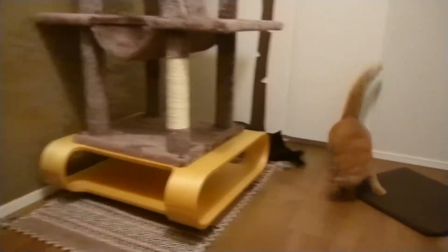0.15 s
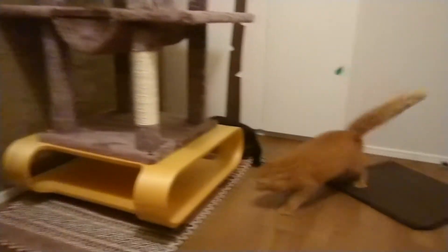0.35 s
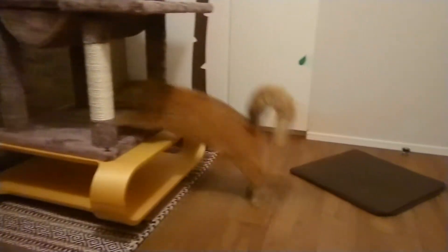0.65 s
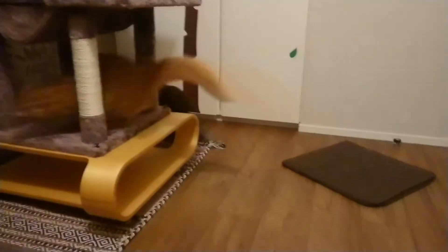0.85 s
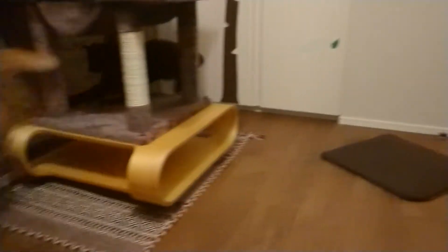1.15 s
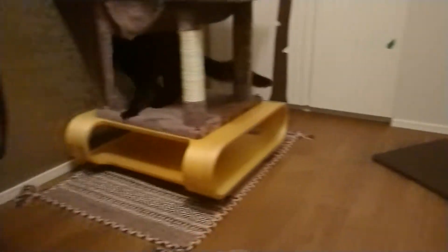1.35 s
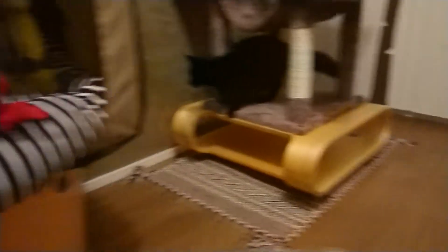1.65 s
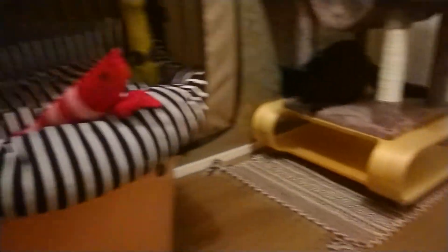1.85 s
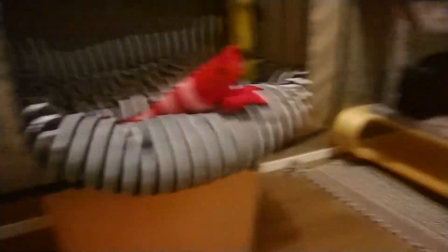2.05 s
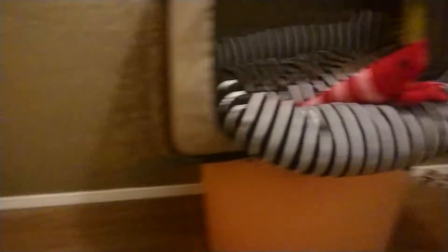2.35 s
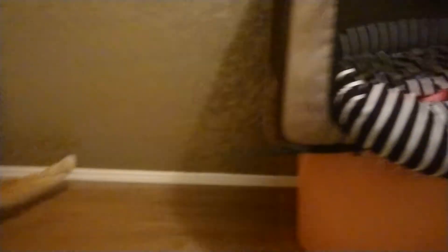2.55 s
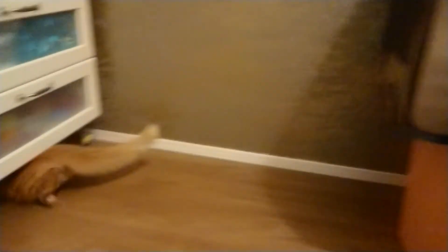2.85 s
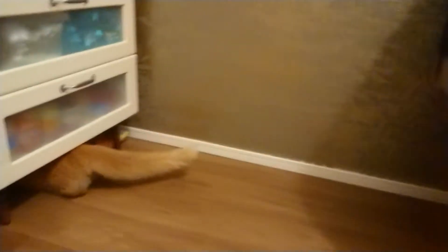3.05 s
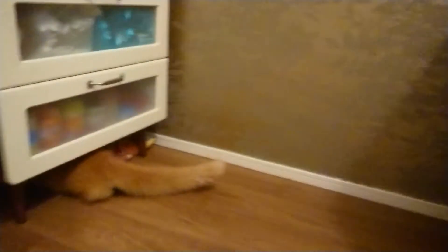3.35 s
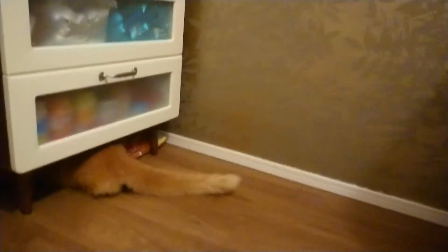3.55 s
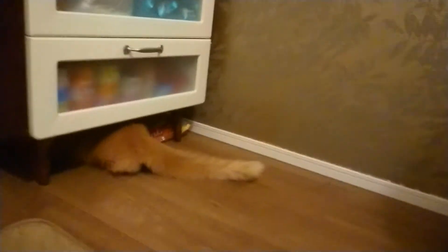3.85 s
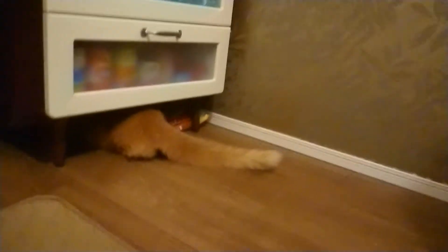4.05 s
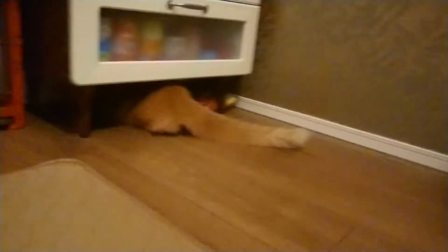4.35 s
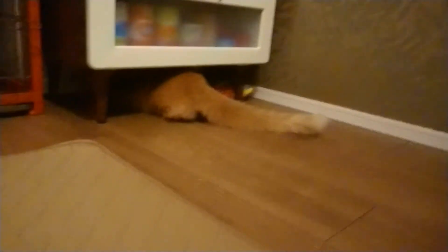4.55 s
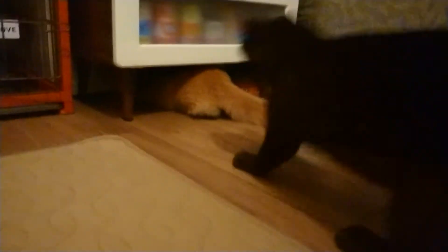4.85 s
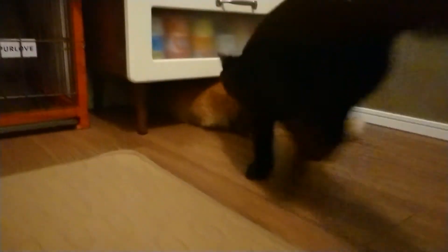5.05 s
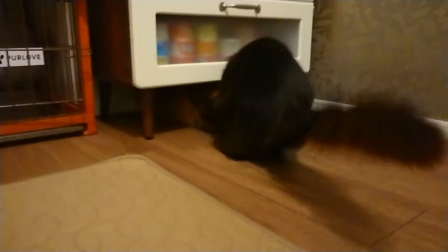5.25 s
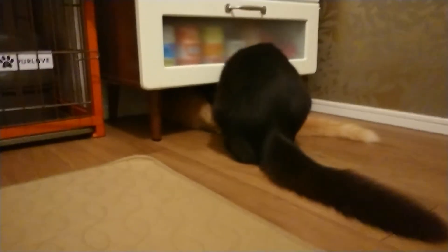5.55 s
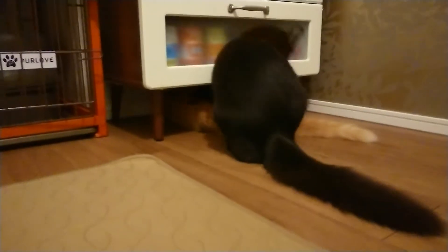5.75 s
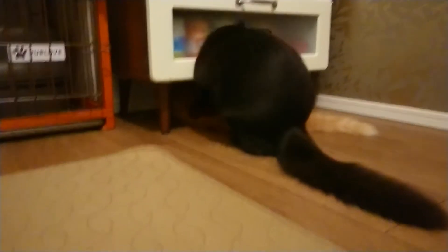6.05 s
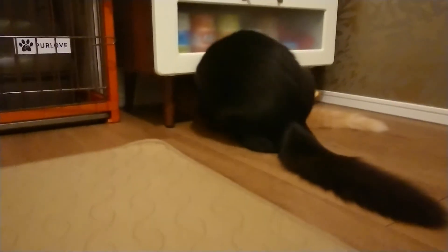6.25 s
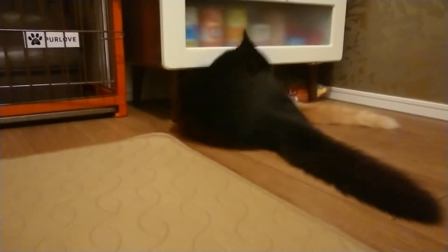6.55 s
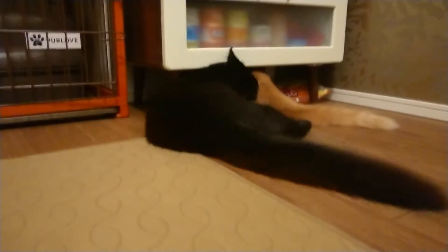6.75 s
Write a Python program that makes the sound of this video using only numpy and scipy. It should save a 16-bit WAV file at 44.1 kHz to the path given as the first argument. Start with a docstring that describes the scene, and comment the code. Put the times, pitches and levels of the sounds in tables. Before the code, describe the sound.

Two cats scamper and scuffle on a wooden floor indoors, paws thudding and claws skittering, with sharp knocks at the handheld camera.

```python
"""Claws scratch and paws thud at once: two cats chase and scuffle on the wooden floor of a small room.
Landings boom in boards and cat tree, claws skitter in noise catches, pads and fur brush along as noise strokes.
Hard clacks ring damped resonances, most on furniture and a few as dry ticks at the hand-held camera.
Something loose rattles on the cat tree; close up, dry knocks and one finger slip sound on the camera.
Behind it all lies the still room, a faint coloured noise from all around."""
import sys
import numpy as np
from scipy import signal
from scipy.fft import rfft, irfft, next_fast_len
from scipy.io import wavfile
from scipy.ndimage import uniform_filter1d, map_coordinates

SR = 44100
rng = np.random.default_rng(int(sys.argv[2]) if len(sys.argv) > 2 else 0)


def unload_audio(sound):
    """Save the sound as a 16-bit wav file, at the path given as the first command line argument."""
    columns = np.transpose(np.atleast_2d(sound))
    # keep every value between -1 and 1, then stretch to whole-number steps
    steps = np.round(np.clip(columns, -1, 1) * 32767)
    wavfile.write(sys.argv[1], SR, steps.astype(np.int16))


N = 304546  # length in samples
T = np.arange(SR // 2) / SR  # time since a blow, s
HZ = np.fft.rfftfreq(len(T), 1 / SR)  # frequency axis of one blow, Hz

# All event levels are relative: each source adds its own level_db or gain.
# Paws and bodies landing on boards and cat tree: (t/s, level/dB, boom f/Hz)
LANDINGS = [(0.044, -48, 796), (0.172, -41.5, 64.7), (0.236, -36, 565), (0.354, -42.5, 298),
            (0.42, -49, 169), (0.554, -42.5, 298), (0.57, -41, 420), (0.615, -51, 363), (0.914, -43.5, 733),
            (0.926, -40.5, 253), (0.942, -40.5, 250), (1.171, -26, 359), (1.199, -34.5, 245),
            (1.226, -34, 310), (1.281, -31, 282), (1.334, -26.5, 460), (1.388, -27.5, 280),
            (1.413, -35.5, 270), (1.567, -41.5, 116), (1.701, -44.5, 239), (1.862, -52.5, 290),
            (1.915, -49, 114), (2.027, -55.5, 191), (2.142, -44, 112), (2.248, -50.5, 188),
            (3.959, -57, 202), (4.046, -58, 154), (4.341, -39.5, 229), (4.362, -45, 70), (4.435, -46, 206),
            (4.461, -40.5, 203), (4.493, -47, 81.5), (4.534, -41.5, 207), (4.563, -34, 203),
            (4.889, -38, 280), (4.929, -51.5, 257), (5.065, -34.5, 187), (5.11, -39, 298),
            (5.157, -39.5, 161), (5.243, -36.5, 96), (5.455, -23, 153), (5.498, -36, 166),
            (6.071, -40.5, 142.4), (6.101, -49.5, 80.7)]
# Claws striking and skidding: (t/s, level/dB, rise/s, skid t60/s, treble tilt/dB per octave)
CLAW_STROKES = [(0.0424, -34.5, .0007, 0.1, 2), (0.0598, -35, 0.00084, 0.0317, 0),
                (0.2382, -34, 0.00095, 0.26, 1.5), (0.2699, -29, 0.00092, 0.032, 1.5),
                (0.2887, -39.5, 0.0027, 0.049, -.5), (0.5587, -48, 0.0011, 0.045, -4),
                (0.845, -51.5, .026, .19, -2.5), (0.9675, -48, 0.00065, 0.017, -3.5),
                (1.0972, -41.5, .0005, .02, -5), (1.1741, -39, 0.00052, 0.015, -5.5),
                (1.3267, -42.5, 0.0033, 0.024, 0), (1.886, -57.5, 0.01, 0.16, 1),
                (2.023, -60.5, 0.0018, 0.095, -6), (2.144, -54.5, .008, 0.12, 2),
                (2.198, -45, 0.00092, 0.066, -2), (2.496, -61, 0.014, 0.078, -13.5),
                (2.864, -46.5, .002, 0.024, -3), (2.919, -52, 0.00052, .009, -6),
                (4.343, -57.5, .001, .036, 7.5), (4.4632, -49, .0007, .04, 9.5),
                (4.485, -48, .027, .064, 15), (4.6098, -48, 0.00045, .013, 7),
                (4.787, -56.5, .02, .074, .5), (4.8583, -51.5, 0.0018, 0.026, 5),
                (5.068, -48.5, .0007, 0.02, -4.5), (5.3218, -42, 0.00039, .027, 0.5),
                (5.748, -43.5, 0.0004, 0.018, -1), (5.9718, -59, .0005, 0.008, 5)]
# Hard clacks on furniture, and a few dry ticks at the camera (3.829, 4.109, 4.1538 s):
# (t/s, level/dB, ring f/Hz, Q)
HARD_CLACKS = [(0.042, -43.5, 930, 2.5), (0.239, -37, 597, 1.8), (0.269, -39, 1080, 0.81),
               (0.554, -45.5, 620, 2.6), (0.914, -38, 684, 2.9), (0.969, -42, 1500, 1),
               (1.097, -33.5, 1280, 0.4), (1.1711, -27.5, 724, 4.2), (1.202, -28.5, 740, 0.89),
               (1.333, -28, 1210, 6), (1.351, -33, 870, 12), (1.399, -38, 1190, 3.6),
               (2.919, -42.5, 1860, 7.2), (3.829, -60, 1500, 2.5), (4.109, -49, 1940, 4.6),
               (4.1538, -37, 2980, 2.3), (4.345, -45, 690, 4.8), (4.366, -47, 786, 4.9),
               (4.539, -49, 650, 2), (4.564, -47.5, 2400, 4.1), (4.6117, -30, 2520, 0.44),
               (4.889, -46.5, 810, 1.8), (5.067, -40, 830, 2.3), (5.322, -28, 1430, 2.1),
               (5.568, -46, 980, 3), (5.749, -34, 970, 3.8), (5.7741, -32.5, 990, 3.2),
               (6.009, -53.5, 1320, 2)]
# Knocks at the camera: (t/s, level/dB, low edge f/Hz, treble roll-off f/Hz, low push re snap/dB)
CAMERA_KNOCKS = [(3.462, -9.6, 400, 4530, -20.5), (3.4649, -23.5, 90, 222.7, -0.5),
                 (3.923, -40, 250, 700, -30), (4.1502, -30.5, 200, 696, -39), (4.1538, -25, 170, 450, -34),
                 (4.1733, -43, 200, 350, -18), (4.19, -50, 250, 450, -28), (4.25, -49.5, 250, 700, -24),
                 (4.286, -53, 400, 1110, -35.5), (4.299, -41, 149, 450, -24),
                 (4.5933, -22.5, 250, 2400, -17.5), (4.712, -38.5, 350, 3220, -15),
                 (4.809, -36, 150, 450, -28), (4.8594, -28.5, 280, 2200, -23), (5.843, -42, 200, 400, -30)]
# Pads and bodies sliding on wood, strokes cut to half a second: (middle t/s, half length/s, level/dB, centre f/Hz)
PAD_SLIDES = [(0.01, 0.066, -52, 750), (0.392, 0.078, -53, 600), (0.657, 0.064, -58, 720),
              (0.789, 0.072, -60, 850), (0.98, 0.062, -51.5, 1450), (1.089, 0.17, -49.5, 1240),
              (1.418, 0.083, -57, 1420), (1.72, 0.052, -65, 1690), (1.972, .1, -63.5, 750),
              (2.21, .087, -63, 780), (2.752, .11, -58, 463), (2.89, .1, -63, 500),
              (3.042, 0.12, -64.5, 1480), (4.421, .15, -66, 1520), (4.655, .05, -62, 2200),
              (4.858, .076, -65, 1700), (5.25, .17, -57, 930), (5.544, 0.19, -67, 830),
              (6.379, 0.037, -66, 895), (6.581, 0.069, -63.5, 435), (6.718, 0.93, -69.5, 1400)]
# Something loose on the shaken cat tree: (t/s, level/dB)
TREE_RATTLES = [(1.172, -37), (1.203, -37), (1.286, -45), (1.33, -45.5), (1.353, -40.5), (1.603, -61),
                (1.711, -55.5)]
# Fur brushing along rug and furniture: (middle t/s, half length/s, level/dB)
FUR_STROKES = [(0.033, 0.19, -58), (0.611, 0.098, -67.5), (0.993, 0.35, -71), (1.62, 0.043, -66),
               (1.947, 0.055, -66.5), (2.112, 0.033, -66.5), (2.219, 0.041, -59), (2.72, 0.088, -71),
               (3.004, .1, -75.5), (3.184, .025, -70), (3.352, .12, -82), (4.512, 0.046, -60.5),
               (4.587, .02, -67.5), (4.886, 0.03, -59), (5.13, 0.065, -65), (5.245, 0.08, -53.5),
               (5.883, 0.11, -76.5), (6.4, 0.037, -76), (6.617, 0.087, -69), (6.852, 0.126, -74.5)]
# How busy the feet are: (t/s, level/dB)
FOOT_BUSTLE = [(0.0, -51.5), (0.25, -52.5), (0.67, -69), (0.94, -60.5), (1.33, -48), (1.86, -64),
               (3.27, -77.5), (4.15, -72.5), (4.44, -59.5), (5.46, -66.5), (5.81, -68), (6.91, -69)]
# How roomy contacts sound and from which side: (t/s, relative room share/dB, left minus right/dB)
CONTACT_PLACE = [(0, 7, -7), (1.2, 1, -6), (1.42, 0.5, -5), (1.6, 6.5, -7.5), (2.9, 1, -4.5),
                 (3.8, -21, -5.5), (4.11, -26, 0), (4.35, 1, -4), (4.58, -5.5, -0.5), (5.1, 3.5, -3),
                 (5.32, -6, -3), (5.5, -1, -1.5), (5.75, 0, 1), (6.1, 1.5, -0.5)]
# Colour of the floorboards: (f/Hz, level/dB)
BOARD_COLOUR = [(21, -58.5), (35, -47.5), (72, 0), (123, -8), (150, -3), (279, -3), (353, -4.5),
                (523, -5.5), (632, -12), (812, -10), (1500, -23.5), (1950, -24.5), (3300, -120)]
# Resonances of the floorboards: (f/Hz, Q, lift/dB)
BOARD_RESONANCES = [(95, 3.2, 0.5), (158, 27, 4), (278.3, 24.9, 5.5), (397, 8, 2)]
# Colour of claws on wood: (f/Hz, level/dB)
CLAW_COLOUR = [(1180, -32), (2000, -6.5), (2400, -4), (3100, -7.5), (3900, -7), (4600, -5.5), (5400, -1),
               (7000, -2.5), (8050, 1.5), (10200, -6), (12800, -10.5), (14500, -10), (16000, -22)]
# Colour shared by the hard clacks and ticks: (f/Hz, level/dB)
CLACK_COLOUR = [(100,-11), (400,-2), (900,0.5), (2000,3.5), (3500,-6), (8000,-11.5), (16000,-37)]
# Resonances of the loose part: (f/Hz, Q, level/dB)
RATTLE_RESONANCES = [(3880, 12, -4.5), (4600, 8, -11.5), (6500, 6.1, -6), (8740, 11, -3.5), (11000, 4, -18)]
# Colour of brushing fur: (f/Hz, level/dB)
FUR_COLOUR = [(1470, -50.5), (2500, -9), (2900, -11.5), (4480, -9), (5520, -7.5), (6700, -11), (7470, -5),
              (12400, -12), (15000, -12), (16000, -11)]
# Colour of the camera case: (f/Hz, level/dB)
CASE_COLOUR = [(30, -39.5), (100, 11.5), (400, 5.5), (800, 5), (1400, 2.5), (2200, -14.5), (3000, -13.5),
               (4200, -15), (5300, -4.5), (8500, -4.5), (12000, -12), (16000, -4)]
# Colour of the still room: (f/Hz, level/dB)
HUSH_COLOUR = [(25,-26), (45,-10), (90,5.5), (150,-8.5), (250,-22), (500,-22), (1100,-17.5), (2000,-20.5),
               (3200,-27), (5500,-35), (12000,-34.5), (16000,-45)]
# Decay of the room: (f/Hz, t60/s)
ROOM_DECAY = [(60, 0.27), (250, 0.37), (1000, 0.37), (4000, 0.46), (9000, 0.3), (16000, 0.38)]
# Diffuse sound at the two microphone ports: (f/Hz, left-right likeness from 0 to 1)
PORT_LIKENESS = [(60, 0.61), (250, 0.88), (600, 0.47), (1200, 0.0067), (8000, 0.027)]

STEPS_PER_S, STEP_SCATTER_DB = 22, 3  # light steps between the landings
SHUDDER_DB, SHUDDER_T60_S = -24.5, 0.53  # the floor keeps trembling after a landing
KNOCK_PAN_DB = 6  # the hand is nearer the left port
HUSH_DB = -71  # rms level of the still room
TOP_HZ = 16150  # upper band limit of the camera


def paws(level_db=-2, room_db=0, q=2.04, soft=2.2, pan_db=-2.5):
    """A padded blow swells and booms in the boards; the soft pad keeps out all that lies far above the boom."""
    out = np.zeros((2, N))
    floor = boards()
    for s, db, hz in LANDINGS:
        wet_db, _ = place(s)
        blow = in_room(signal.unit_impulse(len(T)), room_db + wet_db)
        boom = resonance(hz, q) ** 1.29
        pad = 1 / np.hypot(1, (HZ / (soft * hz + 100)) ** 3)
        add(out, s + .0015, ring(blow, floor * boom * pad), db + level_db, pan_db)
    return out


def shudder():
    """Every landing leaves the floor trembling, in proportion to its weight."""
    t = np.arange(N) / SR
    power = np.zeros(N)
    for s, db, _ in LANDINGS:
        power += (amp(db) * (t > s) * fade(SHUDDER_T60_S, abs(t - s))) ** 2
    return amp(SHUDDER_DB) * np.sqrt(power) * rush(BOARD_COLOUR)


def footwork(steps_db=-4, stir_db=-5, room_db=2):
    """Light steps patter at random and shifting weight stirs the boards, both louder when the cats are busy."""
    bustle = amp(np.interp(np.arange(N) / SR, *np.transpose(FOOT_BUSTLE)))
    step_now = rng.random(N) < STEPS_PER_S / SR
    steps = step_now * amp(STEP_SCATTER_DB * rng.standard_normal(N))
    patter = unit(in_room(ring(steps[None], boards()), room_db))
    return bustle * (amp(steps_db) * patter + amp(stir_db) * rush(BOARD_COLOUR))


def claws(level_db=-3, room_db=3, tick=3.9, grit_db=4.0, uneven_db=1.8, pan_db=0):
    """A claw ticks down, then skids in tiny catches; every spot has its own small resonances."""
    out = np.zeros((2, N))
    for s, db, rise, skid, tilt_db in CLAW_STROKES:
        onset = 1 - np.exp(-T / max(rise, 1e-4))
        stroke = (fade(skid) + tick * fade(0.0086)) * onset
        catches = amp(grit_db * rng.standard_normal(len(T))) * stroke
        scratch = in_room(catches * rng.standard_normal((2, len(T))), room_db)
        spot = uneven_db * unit(uniform_filter1d(rng.standard_normal(len(HZ)), size=220))
        tilt = tilt_db * np.log2((HZ + 500) / 6000)
        colour = amp(along(CLAW_COLOUR, HZ) + spot + tilt)
        add(out, s, ring(scratch, colour), db + level_db, pan_db)
    return out


def clacks(level_db=-2, room_db=-2, scatter=0.11, spread=0.02, port_delay=0.00028):
    """A hard contact rings one damped resonance, with a few milliseconds of scattered noise around it."""
    out = np.zeros((2, N))
    for s, db, hz, q in HARD_CLACKS:
        wet_db, pan_db = place(s)
        contact = scatter * fade(spread) * rng.standard_normal((2, len(T)))
        contact[0, round(port_delay * SR)] += 1  # the left port hears the blow later
        contact[1, 0] += 1
        body = amp(along(CLACK_COLOUR, HZ)) * resonance(hz, q)
        add(out, s, ring(in_room(contact, room_db + wet_db), body), db + level_db, pan_db)
    return out


def rattle(level_db=-3, room_db=1, t60=0.019, grit_db=6, pan_db=1):
    """A short chatter of tiny contacts rings a few bright resonances."""
    out = np.zeros((2, N))
    body = sum(amp(db) * resonance(hz, q) ** 2 for hz, q, db in RATTLE_RESONANCES)
    for s, db in TREE_RATTLES:
        contacts = fade(t60) * amp(grit_db * rng.standard_normal(len(T)))
        chatter = contacts * rng.standard_normal((2, len(T)))
        add(out, s, ring(in_room(chatter, room_db), body), db + level_db, pan_db)
    return out


def slides(level_db=2, q=1.42, grain_db=3, catch_rate=500, room_db=0, pan_share=.7):
    """Pads slide in uneven catches, each stroke stirring the wood around one pitch."""
    out = np.zeros((2, N))
    middle = T[-1] / 2
    ending = 1 - fade(0.085, T[::-1])  # brings the cut end smoothly to zero
    for s, width, db, hz in PAD_SLIDES:
        _, pan_db = place(s)
        stroke = swell(middle, width)[:len(T)] * amp(grain_db * wobble(catch_rate, len(T)))
        friction = in_room(stroke * diffuse(len(T)), room_db)
        wood = resonance(hz, q) / np.hypot(1, (HZ / 3000) ** 2)
        add(out, s - middle, ring(friction, wood) * ending, db + level_db, pan_share * pan_db)
    return out


def brushing(level_db=0, room_db=-3, grain_db=2, pan_db=0):
    """Fur hisses along rug and wood in smooth, finely grained strokes."""
    strokes = sum(amp(db) * swell(s, width) for s, width, db in FUR_STROKES)
    hiss = strokes * unit(rush(FUR_COLOUR) * amp(grain_db * wobble(300)))
    return sides(level_db, pan_db) * in_room(hiss, room_db)


def knocks(level_db=-7, lag=.0005, push_hz=92, push_t60=0.071, port_delay=0.000395, room_db=-30,
           case_hz=1300, case_db=3):
    """Dry knocks: bending waves bring the treble first and the bass last; the case pings and a low push dies away."""
    out = np.zeros((2, N))
    case = amp(along(CASE_COLOUR, HZ) + case_db * resonance(case_hz, 1.5) ** 2)
    bending = 4 * np.pi * lag * np.sqrt(HZ * 1000)  # phase; lag is the travel time at 1 kHz, s
    ports = np.exp(-2j * np.pi * HZ * np.array([[0], [port_delay]]))  # the right port hears it later
    wave = irfft(np.exp(-1j * bending) * ports) * fade(.3)
    push = np.sin(2 * np.pi * push_hz * T) * fade(push_t60) * (1 - fade(0.0033))
    for s, db, low_hz, hz, push_db in CAMERA_KNOCKS:
        treble_cut = 1 / np.hypot(1, (HZ / hz) ** 1.54)
        bass_cut = 1 / np.hypot(1, (low_hz / (HZ + 1)) ** 2)
        snap = ring(wave, case * treble_cut * bass_cut)
        knock = snap / np.abs(snap).max() + amp(push_db) * push
        add(out, s, in_room(knock, room_db), db + level_db, KNOCK_PAN_DB)
    return out


def finger_slip(s=3.4825, db=-41, width=0.0084, pan_db=10):
    """A fingertip slips briefly over the case after the hardest knock: a short swell of coloured noise."""
    colour = [(200, 5), (1500, 0.0), (3000, -1.5), (6000, -3.5), (11000, -11.5), (15000, 4.5)]  # (f/Hz, level/dB)
    return sides(db, pan_db) * swell(s, width) * rush(colour)


def still_room():
    """The steady hush of the room arrives from all around as faint diffuse noise."""
    return amp(HUSH_DB) * rush(HUSH_COLOUR)


def boards():
    """Gain of the floorboards at HZ: a broad colour lifted at a few resonances."""
    lift = sum(db * resonance(hz, q) ** 2 for hz, q, db in BOARD_RESONANCES)
    return amp(along(BOARD_COLOUR, HZ) + lift)


def place(s):
    """Relative room share/dB and left minus right/dB of a contact at s seconds."""
    times, *columns = np.transpose(CONTACT_PLACE)
    return [np.interp(s, times, column) for column in columns]


def in_room(x, room_db):
    """A sound plus the room's answer, a decaying diffuse tail drawn anew for every call."""
    hz, t, z = signal.stft(diffuse(len(T)), SR, nperseg=256)
    decay = fade(along(ROOM_DECAY, hz)[:, None], t)
    tail = signal.istft(z * decay, SR, nperseg=256)[1][:, :len(T)]
    tail = tail * (1 - fade(0.0056))  # the answer builds up after the direct sound
    tail = tail / np.linalg.norm(tail[0])
    answer = signal.fftconvolve(np.atleast_2d(x), tail, axes=1)[:, :x.shape[-1]]
    return x + amp(room_db) * answer


def diffuse(size):
    """Stereo noise from all around: alike in the bass, nearly unrelated in the treble."""
    def mid_and_side(hz):
        turn = np.arccos(np.clip(along(PORT_LIKENESS, hz), -1, 1)) / 2
        return np.array([np.cos(turn), np.sin(turn)])

    mid, side = filtered(rng.standard_normal((2, size)), mid_and_side)
    return np.array([mid + side, mid - side])


def rush(spectrum):
    """Diffuse noise of rms 1 with this colour."""
    return unit(filtered(diffuse(N), lambda hz: amp(along(spectrum, hz))))


def resonance(hz, q):
    """Gain of one resonance at HZ."""
    return 1 / np.hypot(1, q * (HZ / hz - hz / (HZ + 1)))


def ring(x, gain):
    """x through a causal, minimum-phase body with this gain at HZ."""
    cepstrum = irfft(np.log(np.maximum(gain, 1e-6)))
    # folding the cepstrum forward in time makes the response causal
    cepstrum[1:len(T) // 2] *= 2
    cepstrum[len(T) // 2 + 1:] = 0
    response = irfft(np.exp(rfft(cepstrum)))
    return signal.fftconvolve(x, response[None], axes=1)[:, :x.shape[-1]]


def filtered(x, response):
    """x times a response of frequency."""
    n = x.shape[-1]
    m = next_fast_len(n + 8192)
    return irfft(rfft(x, m) * response(np.fft.rfftfreq(m, 1 / SR)), m)[..., :n]


def add(track, s, sound, db, pan_db):
    """Mix in a sound at s seconds, its loudest two milliseconds at db."""
    top = np.sqrt(uniform_filter1d(np.mean(sound ** 2, axis=0), SR // 500).max())
    start = round(s * SR)
    sound = sound[:, max(0, -start):]  # drop what lies before the beginning
    part = track[:, max(0, start):][:, :sound.shape[1]]
    part += (sides(db, pan_db) * sound / top)[:, :part.shape[1]]


def sides(db, pan_db):
    """Left and right gains for a level and a left-minus-right difference."""
    return amp([[db + pan_db / 2], [db - pan_db / 2]])


def swell(s, width):
    """A smooth stroke centred on s seconds."""
    return np.exp(-((np.arange(N) / SR - s) / width) ** 2)


def wobble(rate, size=N):
    """A smooth random curve, rate knots a second."""
    knots = rng.standard_normal(int(size * rate / SR) + 4)
    return map_coordinates(knots, [np.arange(size) * rate / SR])


def fade(t60, t=T):
    """Exponential decay by 60 dB in t60 seconds."""
    return np.exp(-np.log(1000) * t / np.maximum(t60, 1e-4))


def along(points, hz):
    """Interpolate (f/Hz, value) points on a log frequency axis."""
    f, v = np.transpose(points)
    return np.interp(np.log(hz + 1), np.log(f + 1), v)


def unit(x):
    """Scale to rms 1."""
    return x / np.sqrt(np.mean(x ** 2) + 1e-20)


def amp(db):
    """Decibels to gain."""
    return 10 ** (np.asarray(db) / 20)


def scene():
    """The cats, the hard clacks and ticks, the knocks at the camera and the still room."""
    cats = paws() + shudder() + footwork() + claws() + rattle() + slides() + brushing()
    return cats + clacks() + knocks() + finger_slip() + still_room()


def record(dry, low_hz=40):
    """The camera thins out the deep bass and keeps nothing above its band limit."""
    bass_cut = signal.butter(N=4, Wn=low_hz, btype="high", fs=SR, output="sos")
    thinned = signal.sosfilt(bass_cut, dry)
    return filtered(thinned, lambda hz: hz < TOP_HZ)


dry = scene()
out = record(dry)
unload_audio(out)
```